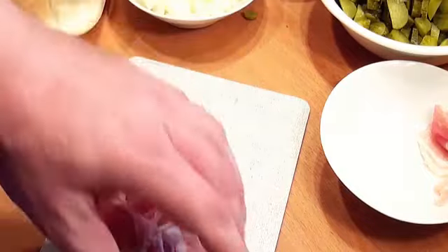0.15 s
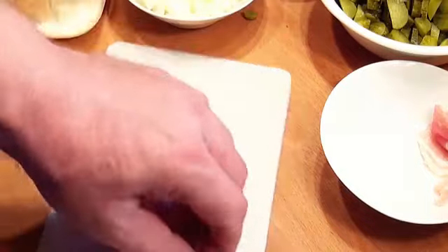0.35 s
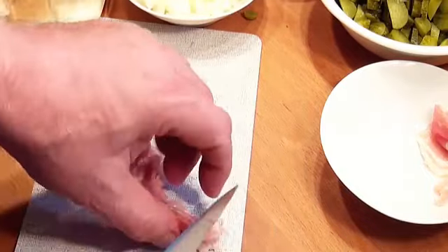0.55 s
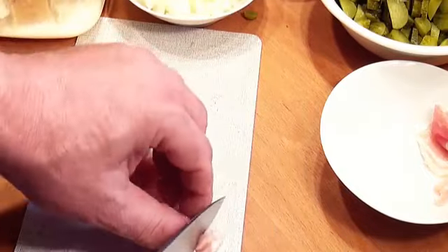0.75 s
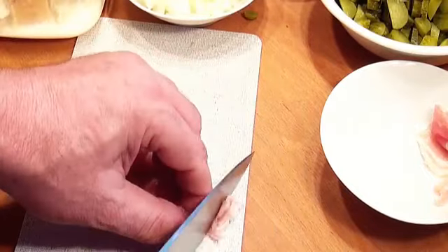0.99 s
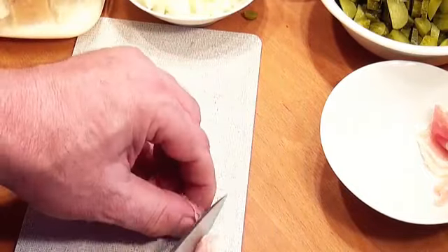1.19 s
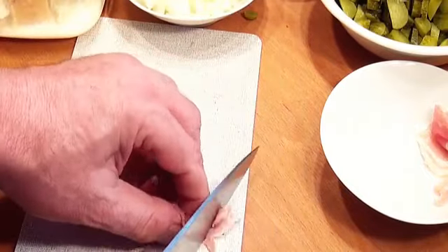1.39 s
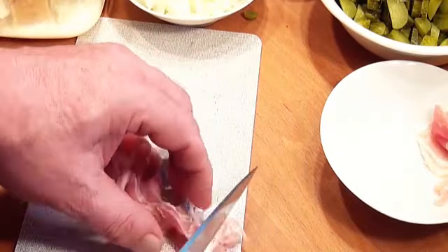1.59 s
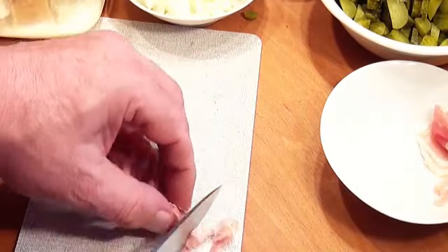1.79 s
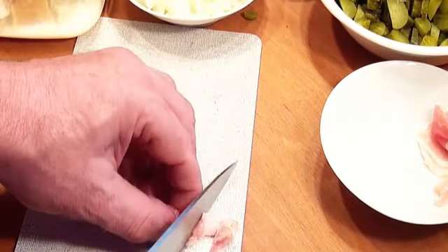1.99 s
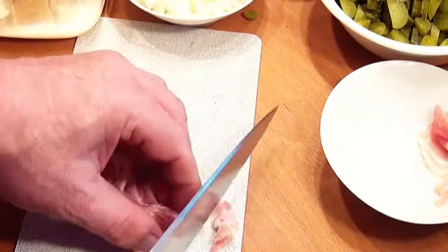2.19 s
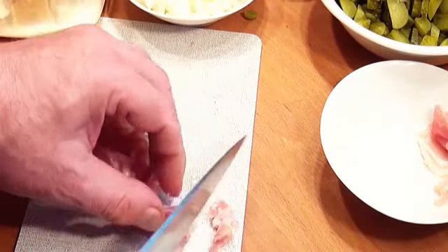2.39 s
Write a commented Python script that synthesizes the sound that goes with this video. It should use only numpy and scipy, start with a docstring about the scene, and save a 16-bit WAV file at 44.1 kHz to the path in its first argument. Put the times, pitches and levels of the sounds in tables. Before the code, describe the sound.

Close knife cuts through meat follow the shuffle and knock of a plastic board shifted on a table. Irregular taps, scrapes and tiny moist snaps end with a short squeaky drag of the blade in a quiet kitchen.

```python
"""A small quiet kitchen, the microphone close to a plastic board on a wooden table.
A knife cuts soft meat. The board is turned and set down; the blade knocks, slides and saws on it,
and squeaks as its edge drags; the meat ticks as it parts. Table legs, table top, board and blade
each ring with their own modes. The work sits right of centre, with a short room tail behind it."""
import sys
import numpy as np
from scipy import signal
from scipy.fft import irfft
from scipy.io import wavfile
from scipy.ndimage import uniform_filter1d

SR = 44100
rng = np.random.default_rng(int(sys.argv[2]) if len(sys.argv) > 2 else 0)


def bounce(signal):
    """Save signal as a 16-bit WAV file at the path given by the first command-line argument."""
    frames = np.transpose(np.atleast_2d(signal))
    limited = np.clip(frames, -1, 1)
    pcm = np.round(limited * 32767).astype(np.int16)
    wavfile.write(sys.argv[1], SR, pcm)


N = 108045


def amp(db):
    return 10 ** (np.asarray(db) / 20)


def unit_rms(x):
    return x / np.sqrt(np.mean(x ** 2) + 1e-20)


def curve_at(points, hz):
    point_hz, value = np.transpose(points)
    return np.interp(np.log(hz + 1), np.log(point_hz + 1), value)


def add(mix, start_s, sound):
    part = mix[round(start_s * SR):][:len(sound)]
    part += sound[:len(part)]


def colour(x, points, share=1):
    """Filters by a curve of (frequency [Hz], gain [dB]), its gains scaled by share."""
    gain = amp(share * curve_at(points, np.fft.rfftfreq(2048, 1 / SR)))
    return signal.oaconvolve(x, np.fft.fftshift(irfft(gain)) * np.hanning(2048), "same")


def narrow(noise, width_hz):
    """Two poles leave a band around 0 Hz, ready to be shifted to a pitch."""
    pole = np.exp(-np.pi * width_hz / SR)
    return signal.lfilter([1], [1, -2 * pole, pole * pole], noise)


# Room tone at the microphone: (frequency [Hz], relative level [dB])
AIR_SPECTRUM = [(15, -20), (25, -6.5), (210, -12), (291, -3), (619, -21), (1630, -45), (2200, -25.5),
                (9430, -28), (15800, -33.5)]
# Its likeness in the two channels: (frequency [Hz], correlation [0-1])
AIR_LIKENESS = [(60, 1), (240, 0.93), (950, 1), (3770, 0.1), (15000, 0.11)]
# Its balance: (frequency [Hz], left minus right [dB])
AIR_BALANCE = [(60, -8.5), (240, 5), (950, -14), (3770, -6.5), (15000, -5.5)]


def room_tone():
    """The quiet floor of the kitchen: steady noise, partly alike in both channels."""
    frames, hz = N // 256 + 5, np.fft.rfftfreq(1024, 1 / SR)[:, None]
    draws = rng.standard_normal((frames, 513, 4)).T
    likeness, lean = curve_at(AIR_LIKENESS, hz), amp(curve_at(AIR_BALANCE, hz) / 2)
    left = draws[0] + 1j * draws[1]
    right = likeness * left + np.sqrt(1 - likeness ** 2) * (draws[2] + 1j * draws[3])
    spectra = np.array([left * lean, right / lean]) * amp(curve_at(AIR_SPECTRUM, hz))
    return amp(-58.5) * unit_rms(signal.istft(spectra, nperseg=1024, noverlap=768)[1][:, :N])


# Modes of the table legs, wooden top, plastic board and steel blade: (pitch [Hz])
LEGS_HZ = [52, 69, 110, 152]
TOP_HZ = [218, 270, 315, 368, 410, 488, 522]
PLASTIC_HZ = [660, 780, 870, 945, 1080, 1152, 1250, 1450, 1577, 1640, 1790, 1850, 1960]
STEEL_HZ = [2140, 2340, 2540, 2700, 2870, 3150, 3620, 3972, 5290, 5750, 7400, 7650, 8118, 8233]
# The same four bodies, one list a column: (pitch [Hz], level [dB], t60 [s])
LEGS = LEGS_HZ, [-21.5, -5.5, -28.5, -1], [0.59, 0.28, 0.054, 0.067]
TABLE_TOP = TOP_HZ, [-3.5, 2, -4.5, -1.5, -2, -8.5, 0.5], [0.15, 0.1, 0.18, 0.19, 0.15, 0.19, 0.082]
BOARD = PLASTIC_HZ, [-10, -4, 3.5, 0.5, -3, -5.5, 1.5, 1.3, -4, -5, -10, -4, -6], [0.12, 0.11, 0.016, 0.04,
         0.033, 0.048, 0.038, 0.072, 0.062, 0.088, 0.017, 0.052, 0.038]
BLADE = STEEL_HZ, [-11, -10, -7, -11, -8, -10, -7, -8, -5, -10, -5, -10, -8, -3], [.04, .045, .045, .04,
         .04, .04, .05, .045, .07, .04, .04, .03, .03, .022]


def ring(body, ratio=1, place=0, ring_share=1, count=None, loud_hz=None, octaves=1):
    """Dying sines of one body; the place of the blow favours some modes, as does nearness to loud_hz."""
    hz, db, t60 = np.array(body)[:, :count, None]
    t60 = t60 * ring_share
    t, mode = np.arange(0, min(t60.max(), .4), 1 / SR), np.arange(len(hz))[:, None]
    if place > 0:
        db = db + 6 * np.sin(2 * np.pi * 1.654 * place * np.sqrt(mode + 1) + mode)
        db += 2.5 * (place - .3) * np.log2(hz / hz.mean())  # brighter further along
    if loud_hz:
        db = db + 11.5 * (np.exp(-(np.log2(hz * ratio / loud_hz) / octaves) ** 2) - .5)
    swell = 1 - np.exp(-t * hz / 0.26)  # full in about a cycle
    sines = swell * amp(db - 60 * t / t60) * np.sin(2 * np.pi * hz * ratio * t + mode ** 2)
    return signal.sosfilt(signal.butter(3, .7 * hz.min(), "high", fs=SR, output="sos"), sines.sum(0))


# Sliding and sawing close to the microphone, one continuous level curve:
# (time [s], hiss [dB], legs [dB], table top [dB], board [dB], blade [dB])
RUB_LEVELS = [
    [(0.0, -64.5, -65, -55.5, -60.5, -61), (0.19, -63.5, -68, -59, -59, -62),
     (0.224, -54, -79, -67, -56, -51), (0.228, -39, -57, -42, -36.5, -42.5),
     (0.278, -50, -57, -58, -59, -49), (0.372, -37.5, -72, -47.5, -40.5, -41),
     (0.414, -37.5, -71, -52, -48.5, -46), (0.428, -50, -56, -85, -32, -42)],
    [(0.47, -53, -50.5, -34.5, -36.5, -52), (0.53, -62, -59, -55.5, -55, -55),
     (0.61, -78, -90, -67, -65.5, -83), (0.72, -93, -83, -68.5, -71, -95), (0.794, -60, -71, -70, -66, -84),
     (0.8, -77, -63, -88, -70.5, -95), (0.9, -62, -84, -58, -68, -84)],
    [(0.9, -57, -73, -72, -83, -77), (0.914, -65, -69, -78, -64, -76), (0.926, -52, -67, -62, -62, -71),
     (0.934, -58, -69, -68, -63.5, -68), (0.99, -46.5, -61, -41, -50.5, -65)],
    [(1.015, -52, -62, -44.5, -57, -77), (1.091, -70, -91, -55.5, -66, -61),
     (1.12, -66, -66, -69, -62, -69)],
    [(1.12, -62, -59, -75, -50, -77), (1.15, -53, -69, -55, -56, -73), (1.266, -53.5, -62, -65, -60.5, -81),
     (1.282, -63.5, -57, -47.5, -64, -66), (1.352, -40, -57, -49, -44, -53)],
    [(1.37, -45, -52, -52.5, -43, -44), (1.422, -49.5, -68, -43, -56, -67), (1.43, -44, -52, -55, -48, -63),
     (1.442, -49.5, -50, -58, -47, -53), (1.498, -62.5, -66, -48, -59.5, -62),
     (1.53, -43, -66, -54.5, -63, -69), (1.56, -66, -61, -51, -64, -72), (1.62, -65, -71, -73, -68, -69)],
    [(1.62, -69.5, -85, -60.5, -64.5, -66.5), (1.81, -73, -87, -60.5, -65.5, -64),
     (1.9, -65, -73, -60, -61.5, -64), (1.914, -54, -75, -56.5, -68, -62), (1.922, -63, -73, -51, -64, -62),
     (1.95, -56.5, -89, -61, -55, -59), (1.974, -63.5, -78, -53, -64, -59),
     (2.03, -49, -57, -50, -45.5, -50.5)],
    [(2.03, -52, -56, -56, -57, -60.5), (2.084, -40, -47, -45, -42, -36.5),
     (2.118, -43, -56.5, -47.5, -46.5, -57), (2.154, -34.5, -71, -51, -45, -54),
     (2.194, -51.5, -60, -54, -49, -73), (2.21, -45, -64, -47.5, -65, -76),
     (2.254, -59.5, -68, -74, -62, -65), (2.45, -72, -74, -69, -69, -73)],
]
# Colour of the hiss: (frequency [Hz], relative level [dB])
HISS_SPECTRUM = [(2060, -22.5), (3500, -12), (4450, -17.5), (5400, -12.5), (6730, -12), (7780, -10),
                 (10500, -9), (12300, -20), (14700, -15), (15800, -38)]
SLIPS_PER_S, SPURT_DB, SPURT_S = 5500, 1.5, 0.0044
DULL_HZ, LIGHT_DB, HARD_DB = 3480, -48, -46  # light rubbing of the blade is dull, hard rubbing bright


def slips():
    """Friction as a dense train of tiny impulses, uneven in size and sign."""
    sizes = amp(2 * np.minimum(rng.exponential(1, N), 4))
    return sizes * (rng.random(N) < SLIPS_PER_S / SR) * rng.choice([-1., 1.], N)


def rubbing():
    """Slips hiss in wet spurts and excite the four bodies, damped by the hand."""
    times, *columns = np.transpose(np.concatenate(RUB_LEVELS))
    hiss_db, *body_levels = [np.interp(np.arange(N) / SR, times, db) for db in columns]
    hiss = slips()
    spurts = unit_rms(uniform_filter1d(rng.standard_normal(N), round(SPURT_S * SR)))
    hiss *= amp(SPURT_DB * spurts)
    out = colour(hiss * amp(hiss_db), HISS_SPECTRUM) / colour(hiss, HISS_SPECTRUM).std()
    for body, db in zip((LEGS, TABLE_TOP, BOARD, BLADE), body_levels):
        friction = slips()
        tap = ring(body, ring_share=0.18, count=8 if body is BLADE else None)
        sound = signal.oaconvolve(friction * amp(db), tap)[:N] / np.linalg.norm(tap) / friction.std()
        if body is BLADE:
            hard = np.clip((db - LIGHT_DB) / (HARD_DB - LIGHT_DB), 0, 1)
            dull = signal.filtfilt(*signal.butter(4, DULL_HZ, fs=SR), sound)
            sound = hard * sound + (1 - hard) * dull
        out += sound
    return out


# Knocks of board and knife, close up: (time [s], legs [dB], table top [dB], board [dB], blade [dB],
# crack [dB], place along the bodies [0-1], ring time [times the free ring time])
KNOCKS = [(0.2099, -28, -29.5, -40.5, -37, -31, 0.12, 0.78), (0.229, -43, -41.5, -39, -31, -30, 0.08, 0.58),
          (0.232, -33, -25, -55, -52, -59, .2, 0.86), (0.2546, -24.5, -57, -63, -68, -52, 0.21, 0.56),
          (0.279, -24.5, -31, -65, -61, -60, 0.12, 0.58), (0.4331, -60, -25, -17.5, -19.5, -17, 0.54, 0.61),
          (0.4384, -58, -24.5, -41, -25.5, -9, 0.45, 0.8), (0.441, -64, -42, -61, -19, -38, 0.3, 1.5),
          (0.9942, -44.5, -32.5, -27, -36, -44, 0.33, 0.64),
          (0.9998, -70, -41.5, -42, -23, -24, 0.42, 0.46), (1.126, -81, -48.5, -46, -47, -54, 0.41, 0.64),
          (1.267, -62, -37, -58, -74, -68, 0.27, 0.33), (1.328, -53, -43.5, -45.5, -55, -53, 0.47, 0.37),
          (1.3604, -43.5, -41, -43, -28.5, -25.5, .2, 0.97),
          (1.4284, -51.5, -61, -76, -42.5, -37, 0.22, 0.65),
          (1.524, -59, -43.5, -54.5, -64, -49, 0.26, 1.11), (2.076, -43, -45, -37.5, -55, -52, 0.41, 1.07),
          (2.153, -46, -40.5, -50.5, -32.5, -26.5, 0.37, 0.62),
          (2.167, -67, -60, -54, -39, -29, 0.64, 0.28), (2.209, -76, -51.5, -53, -42, -42, 0.16, 1)]
# How each lands: (pitch of the pressed blade [ratio], blade favoured at [Hz], top favoured at [Hz])
LANDINGS = [(1, 2600, 300), (1, 3600, 280), (1, 3600, 280), (1, 3100, 270), (1, 2700, 220), (1, 3700, 370),
            (1, 5300, 440), (1, 8100, 490), (1.02, 2900, 400), (1.02, 5900, 400), (1, 2500, 440),
            (1, 2500, 310), (1, 2500, 220), (.968, 2460, 250), (1, 5300, 290), (1, 4200, 410),
            (1, 2500, 290), (1, 2500, 290), (1, 3600, 290), (1.125, 9200, 290)]
CRACK_RISE_S, CRACK_BAND_HZ = 0.0016, [1500, 6240]


def knocks():
    """Each contact rings legs, board, blade and table top and gives a short crack of noise."""
    out, t = np.zeros(N), np.arange(600) / SR
    noise = rng.standard_normal((len(KNOCKS), len(t)))
    cracks = signal.lfilter(*signal.butter(2, CRACK_BAND_HZ, "band", fs=SR), noise)
    cracks *= t / CRACK_RISE_S * np.exp(1 - t / CRACK_RISE_S)
    for knock, (ratio, blade_hz, top_hz), crack in zip(KNOCKS, LANDINGS, cracks):
        start, legs_db, top_db, board_db, blade_db, crack_db, place, share = knock
        legs = ring(LEGS, ratio=0.98, place=place)
        board = ring(BOARD, ratio=0.98, place=place, ring_share=share)
        blade = ring(BLADE, ratio=ratio, ring_share=share, loud_hz=blade_hz, octaves=0.27)
        top = ring(TABLE_TOP, ring_share=share, loud_hz=top_hz, octaves=0.28)
        for db, sound in (legs_db, legs), (board_db, board), (blade_db, blade), (top_db, top):
            add(out, start, amp(db) * sound)
        add(out, start, amp(crack_db) * crack)
    return out


# Ticks and short crunches under the knife: (time [s], peak level [dB], pitch [Hz], rise [ms])
MEAT_TICKS = [(0.7908, -52, 7100, .4), (.9239, -29, 9320, 0.53), (0.9489, -34.5, 9060, 0.85),
              (0.9632, -30, 7200, 0.21), (0.987, -57, 5260, 0.54), (1.151, -37, 11700, 0.59),
              (1.26, -35, 12400, 0.39), (1.331, -32.5, 9080, 1.6), (1.3477, -40, 9200, 1.4),
              (1.3535, -44, 9400, .5), (1.36, -16, 9100, 0.52), (1.4296, -26.5, 9940, 0.68),
              (1.462, -41, 11300, .4), (1.502, -49, 8900, 1.6), (1.521, -40, 10100, 0.27),
              (1.525, -29.5, 10180, 3.1), (1.532, -31, 9100, 0.4), (1.9136, -36, 11300, 0.29),
              (1.9313, -37, 9300, 0.52), (1.9448, -37.5, 9440, 0.56), (1.9859, -45, 9700, 0.57),
              (2.0234, -41, 8300, 0.46), (2.155, -27, 9800, 0.48), (2.167, -34, 11700, 0.33),
              (2.205, -27, 10240, 1.2)]


def meat_ticks():
    """The meat parts in bright snaps, each a soft burst of noise around one pitch."""
    out, t = np.zeros(N), np.arange(900) / SR
    for start, db, hz, rise_ms in MEAT_TICKS:
        real, imag = rng.standard_normal((2, len(t)))
        puff = narrow((real + 1j * imag) * t * np.exp(-t * 1e3 / rise_ms), width_hz=3500)
        snap = (puff * np.exp(2j * np.pi * hz * t)).real / abs(puff).max()
        add(out, start, amp(db) * snap)
    return out


# The knife edge dragged over the board: (time [s], pitch [Hz], level [dB])
EDGE_SQUEAK = [(1.68, 1630, -69), (1.77, 1630, -67.5), (1.951, 1625, -63), (2.021, 1584, -49),
               (2.054, 1590, -64), (2.078, 1634, -39), (2.107, 1558, -43), (2.12, 1484, -37.5),
               (2.16, 1522, -36), (2.182, 1523, -54.5), (2.218, 1490, -62), (2.239, 1500, -87)]


def edge_squeak():
    """Noise in a narrow resonance and its octave, wandering as the edge drags."""
    times, hz, db = np.transpose(EDGE_SQUEAK)
    t = np.arange(N) / SR
    noise = rng.standard_normal((2, N)) + 1j * rng.standard_normal((2, N))
    fundamental, octave = narrow(noise, width_hz=75)
    carrier = np.exp(2j * np.pi * np.cumsum(np.interp(t, times, hz)) / SR)
    tone = unit_rms((fundamental * carrier + amp(-11) * octave * carrier ** 2).real)
    return tone * amp(np.interp(t, times, db)) * (t > times[0]) * (t < times[-1])


# The kitchen's decay, heard from the table: (frequency [Hz], t60 [s])
KITCHEN_DECAY = [(60, 0.63), (250, 0.17), (1000, 0.16), (4000, 0.21), (9000, 0.19), (15000, 0.17)]
ECHO_GAP_S, ECHO_LOW_HZ, ECHO_HIGH_HZ, TURNS_PER_S = 0.0028, 290, 6300, 2.3


def kitchen_echoes(near):
    """Sparse reflections of random sign, each band dying at its own speed; four sets take turns."""
    send = signal.lfilter(*signal.butter(1, ECHO_HIGH_HZ, fs=SR), near)
    send = signal.lfilter(*signal.butter(2, ECHO_LOW_HZ, "high", fs=SR), send)
    out, turn = np.zeros((2, N)), np.arange(N) / SR * TURNS_PER_S
    for k in range(4):
        taps, count = np.zeros((2, SR // 2)), (SR // 2 - 40) // 20
        arrivals = np.arange(count) * 20 + rng.integers(0, 20, (2, count))
        np.put_along_axis(taps, arrivals, rng.choice([-1., 1.], (2, count)), 1)
        hz, t, bands = signal.stft(taps, SR, nperseg=256)
        decay = amp(-60 * t / curve_at(KITCHEN_DECAY, hz)[:, None])
        tail = signal.istft(bands * decay, SR, nperseg=256)[1]
        tail = np.pad(tail / np.linalg.norm(tail[0]), ((0, 0), (round(ECHO_GAP_S * SR), 0)))
        fade = np.cos(np.pi / 2 * np.clip((turn - k + 2) % 4 - 2, -1, 1))
        out += signal.fftconvolve((send * fade)[None], tail, axes=1)[:, :N]
    return amp(-3) * (out + 0.047 * out[::-1])  # a little of each side reaches the other


# Balance of the cutting at the microphone: (frequency [Hz], left minus right [dB])
BALANCE = [(40, -11), (90, -10.5), (180, -8), (350, -6), (1400, -6.8), (2800, -6), (5600, -4), (8200, -.5),
           (10500, -4.5), (14000, -9)]


def scene():
    """The close cutting and its echoes, leaning right, over the room tone."""
    near = knocks() + rubbing() + edge_squeak() + meat_ticks()
    left, right = near + kitchen_echoes(near)
    return np.array([colour(left, BALANCE, .5), colour(right, BALANCE, -.5)]) + room_tone()


def record(dry):
    """The camera's microphone channel cuts off steeply at the top of the treble."""
    lowpass = signal.firwin(511, cutoff=15880, window=("kaiser", 9), fs=SR)
    return signal.oaconvolve(dry, lowpass[None], "same")


dry = scene()
out = record(dry)
bounce(out)
```